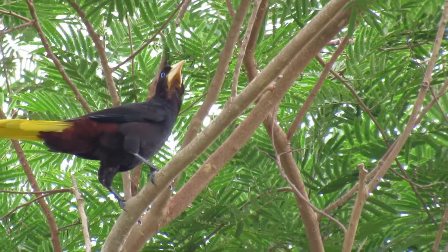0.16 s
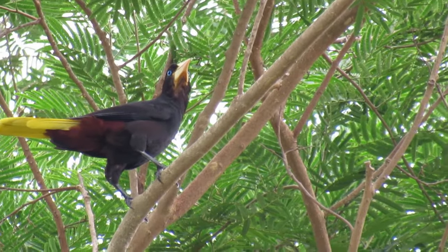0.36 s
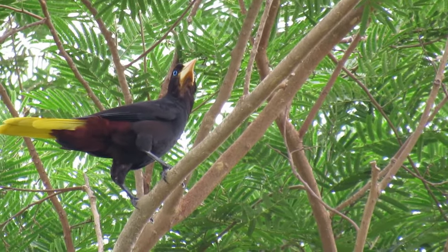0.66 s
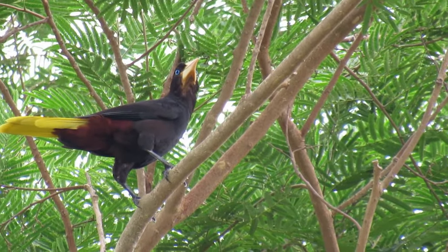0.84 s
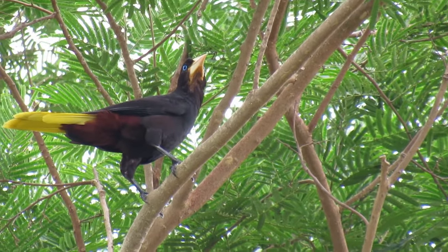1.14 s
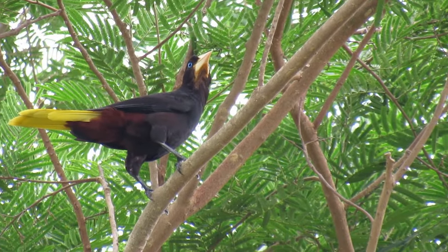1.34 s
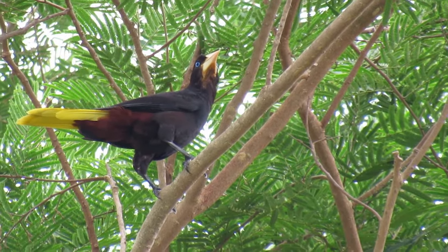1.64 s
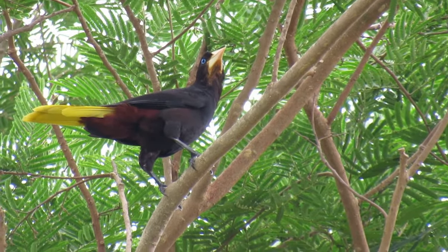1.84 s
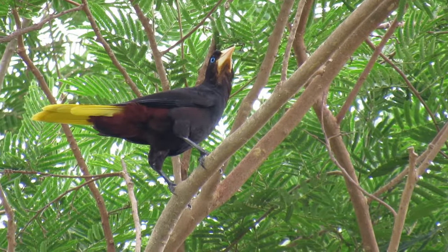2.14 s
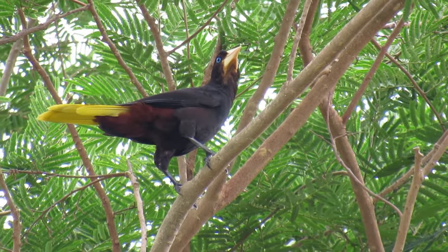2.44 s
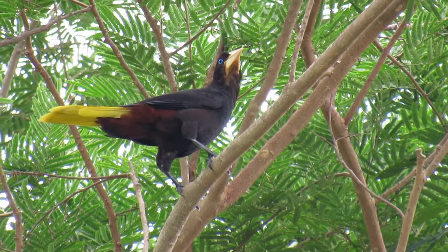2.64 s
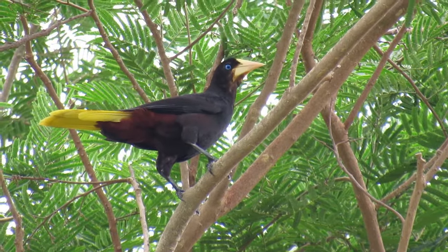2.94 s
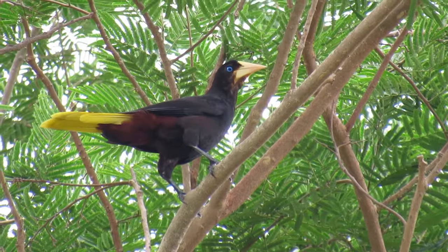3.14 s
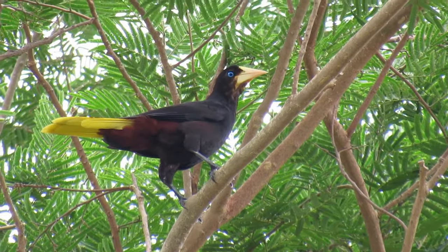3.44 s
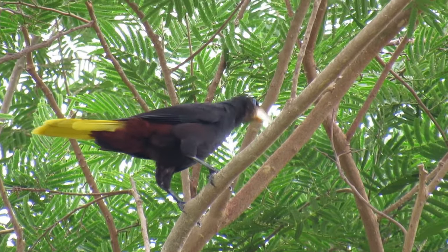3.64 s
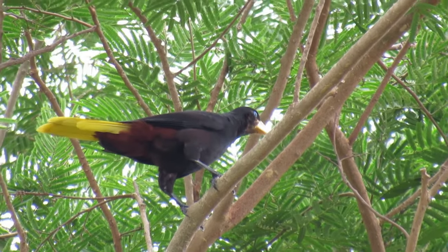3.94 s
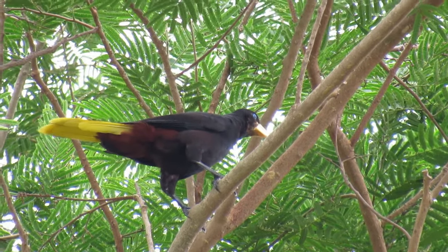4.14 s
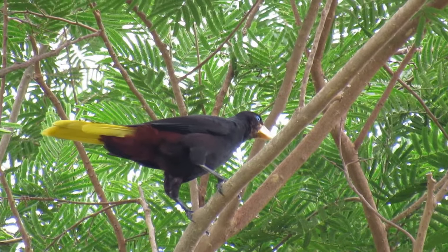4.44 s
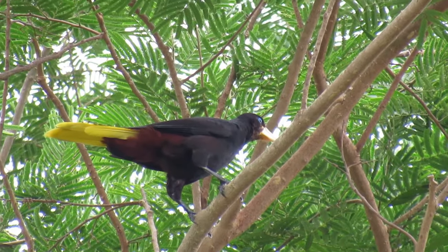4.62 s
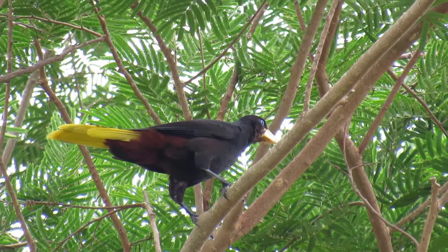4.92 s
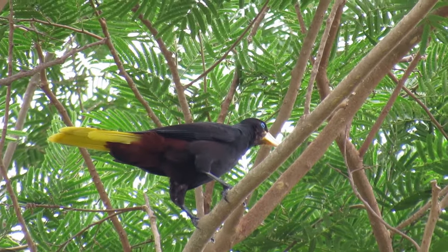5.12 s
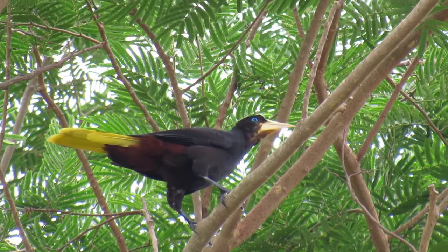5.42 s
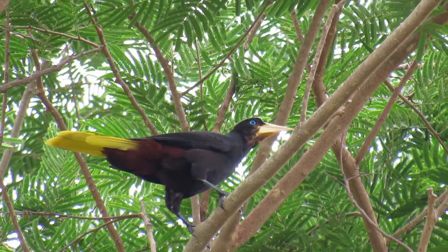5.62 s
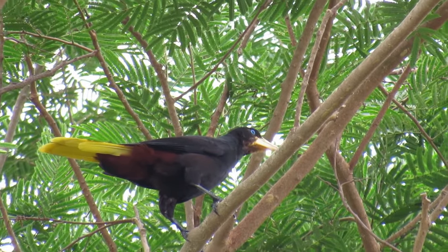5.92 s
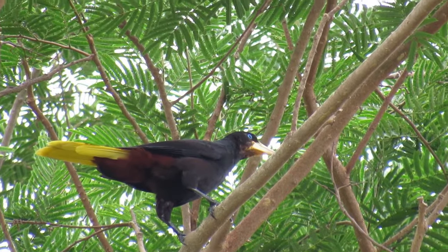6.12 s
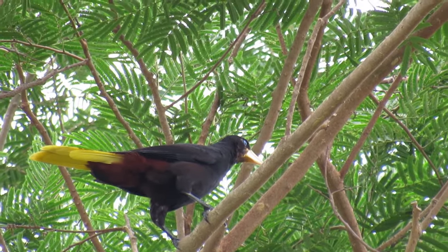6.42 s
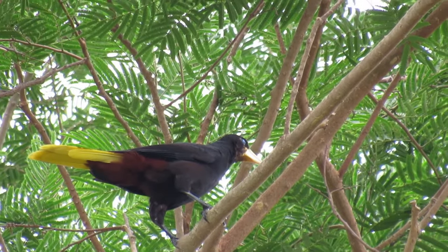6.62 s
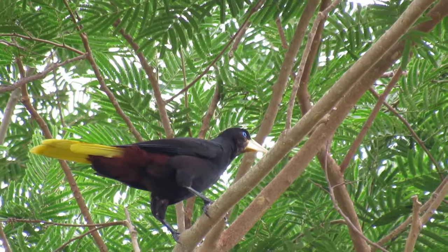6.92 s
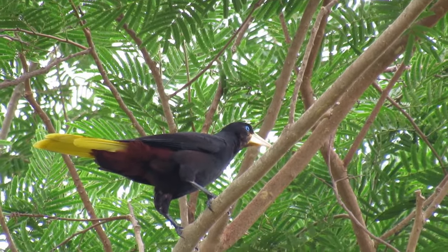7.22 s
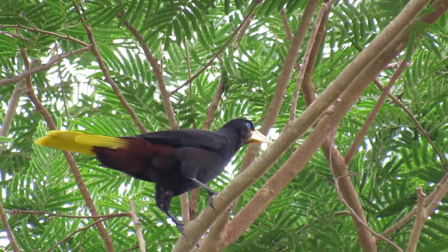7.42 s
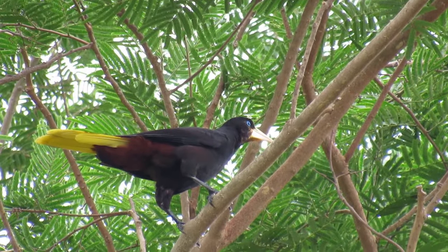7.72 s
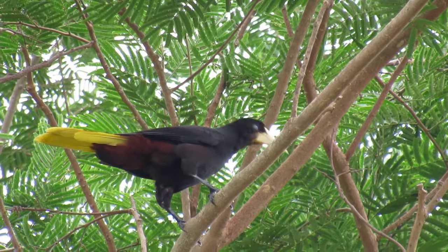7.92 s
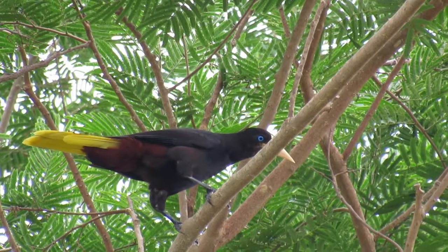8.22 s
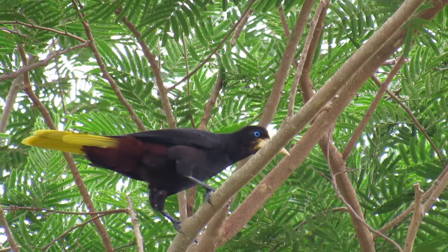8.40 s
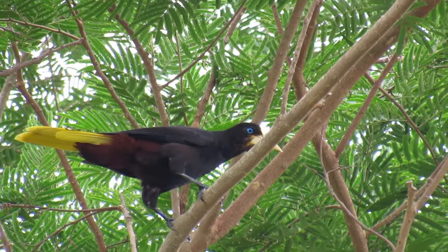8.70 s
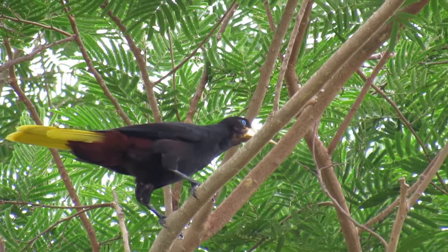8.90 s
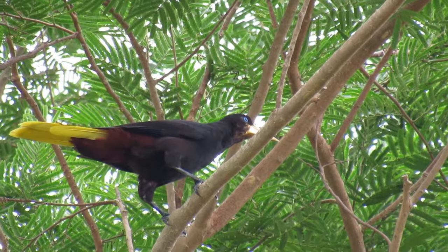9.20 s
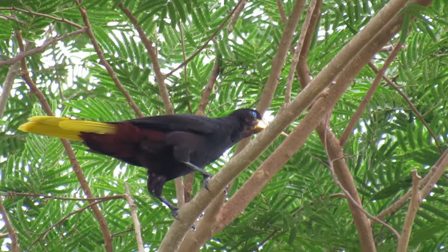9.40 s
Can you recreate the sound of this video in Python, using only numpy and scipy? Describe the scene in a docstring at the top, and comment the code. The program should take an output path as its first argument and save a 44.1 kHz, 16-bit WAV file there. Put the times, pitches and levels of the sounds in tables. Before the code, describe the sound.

Outdoors among trees, a bird's buzzy descending whistle tumbles into knocks, liquid gurgles and low coos, then repeats above distant engine rumble.

```python
"""Tropical trees: a large bird sings twice, as two voices in one windpipe. Harmonic stacks through resonances
make its falling buzzy whistle and cooed notes; short pitched bursts make hollow clucks and a gurgle.
An insect's throbbing tone sits near 7.5 kHz; gliding sines are far birds, the singer's own faint squeaks and
low hum, and a rising whine. Harmonics of a firing rate idle as a distant engine; crackle through a small body
rasps now and then. Leaves, traffic and microphone hiss are noise bands; two small ports hear it all."""
import sys
import numpy as np
from scipy import signal
from scipy.fft import rfft, irfft, next_fast_len
from scipy.io import wavfile
from scipy.ndimage import uniform_filter1d

SR = 44100
rng = np.random.default_rng(int(sys.argv[2]) if len(sys.argv) > 2 else 0)


def gain_from_db(level_db):
    """Convert decibel levels to linear amplitude factors (20 dB per decade)."""
    decades = np.asarray(level_db, float) / 20
    return 10 ** decades


def pcm_store(signal):
    """Save signal as 16-bit PCM."""
    levels = np.round(np.clip(np.atleast_2d(signal), -1, 1) * 32767)
    wavfile.write(sys.argv[1], SR, levels.astype(np.int16).T)


N = 421155
T = np.arange(N) / SR
SIZE = next_fast_len(N + SR)
HZ = np.maximum(np.arange(SIZE // 2 + 1) * SR / SIZE, 1)

# the two ports: f/Hz, left minus right/dB, left's lead less one full turn/rad, likeness of diffuse sound/0-1
PORTS = [(45, -10, -1.2, .97), (110, -13, -1.6, .65), (200, -11, -3.3, .3), (400, -5, -3.7, .5),
         (700, -3, -3.9, .45), (1300, -2, -5.2, .4), (2100, -2, -6.1, .7), (4300, -2.5, -6.3, .78),
         (7800, -3.3, -6.3, .87), (14400, 0, -6.3, .86)]
# leaves, traffic and microphone hiss: f/Hz, level/dB per Hz
BED = [(25, -73), (60, -69), (110, -66), (270, -71.5), (350, -77), (560, -82.5), (820, -86.5), (1300, -89),
       (2600, -95.5), (4000, -101), (8500, -102), (13000, -108), (14200, -111), (15000, -140)]
# idling engine: t/s, firing rate f/Hz, level/dB of the fundamental, level/dB of the second harmonic
ENGINE = [(0.0, 45.06, -33, -41), (0.16, 45.62, -36, -40.5), (0.5, 43.74, -39.5, -54),
          (0.66, 45.49, -40, -44), (1.57, 43.85, -50, -48.5), (1.89, 47.1, -44.5, -42.5),
          (2.308, 45.63, -46, -44.5), (4.92, 48.34, -40.5, -43.5), (6.199, 46.15, -49.5, -43.5),
          (6.46, 46.6, -41.5, -46), (9.34, 46.56, -48, -45.5), (9.55, 47.07, -53.5, -41)]
# its steady orders: multiple of the firing rate, level/dB
ENGINE_ORDERS = [(1.5, -57.5), (3, -48), (4, -54), (5, -57), (5.5, -55.5)]
# resonances of the far insect chorus: f/Hz, width/Hz of one pass, gain/dB
CHORUS = [(7310, 210, -6.5), (7148, 250, -6.5), (6700, 184, -12)]
# busy spells of faint chirps: start t/s, end t/s
CHATTER_SPELLS = [(0, 1.3), (5.9, 6.8), (8, 9)]
# thin faint whistles: far birds, the singer's own faint squeaks and low hum, a rising whine:
# t/s, length/s, start f/Hz, end f/Hz, level/dB
THIN_WHISTLES = [(.062, 0.052, 4500, 4420, -66), (0.475, 0.13, 5210, 5150, -69),
                 (.695, 0.0224, 3490, 3300, -60), (0.952, 0.032, 3450, 3310, -65),
                 (1.6, 0.022, 5600, 5760, -65), (1.62, 0.05, 5200, 5150, -68),
                 (1.68, 0.016, 5700, 5400, -61), (3.03, 0.5, 6850, 7010, -63),
                 (3.228, 0.027, 6500, 4994, -68), (3.42, .55, 7020, 7390, -58),
                 (6.32, .11, 9900, 9950, -73), (6.48, .025, 4100, 3700, -68), (6.57, 0.49, 1500, 1487, -66),
                 (6.625, 0.05, 2280, 2344, -68), (6.703, 0.29, 540, 619, -60),
                 (8.025, 0.053, 6400, 4154, -70), (8.251, 0.038, 6314, 4970, -66),
                 (8.582, 0.025, 3450, 2980, -64)]
# short rasps: t/s, nominal length/s, level/dB ahead of the body
RASPS = [(1.428, 0.0504, -51.5), (3.381, 0.045, -52), (4.63, 0.04, -52), (6.039, 0.044, -55),
         (7.69, 0.046, -54), (8.663, 0.041, -53)]
# the small body they ring: f/Hz, width/Hz of one pass, gain/dB
RASP_RING = [(1577, 340, 9.5), (2230, 1520, 10.5), (3420, 1300, 2.5), (5780, 1200, 1.5), (9050, 2200, -0.5)]
# round clucks of the low voice, throat tuned to the second harmonic, and a brief high overtone of a coo
# at 7.78 s: t/s, length/s, pitch f/Hz, level/dB
CLUCKS = [(1.288, 0.023, 479, -42), (1.336, 0.026, 438.8, -52), (1.52, 0.035, 616, -53.5),
          (1.647, 0.032, 570, -51.5), (2.146, 0.045, 471, -37), (6.257, 0.036, 469, -51.5),
          (6.402, .018, 413, -47), (6.537, 0.088, 466, -42.5), (6.714, 0.033, 559, -55),
          (6.831, 0.073, 567, -55), (6.897, 0.045, 748, -56), (6.931, 0.0245, 574, -44.5),
          (7.013, .025, 579, -37), (7.406, 0.034, 727, -32), (7.459, 0.04, 477, -37.5),
          (7.782, .05, 825, -50), (8.031, 0.022, 775, -48.5)]
# hard knocks, throat wide open: t/s, pitch f/Hz, level/dB, level/dB of the snap ahead of its ring, throat f/Hz
KNOCKS = [(1.703, 543, -53, -39, 1100), (1.761, 535, -43.5, -38, 1385), (1.829, 666, -37.5, -30.5, 1600),
          (1.9, 710, -36, -34.5, 1440), (1.958, 706, -34.5, -29, 1460), (2.028, 334.4, -37, -34.5, 1449),
          (2.093, 314, -38, -33.5, 1510), (7.081, 382, -45, -40.5, 1470), (7.142, 310, -44, -37, 1488),
          (7.214, 311.2, -47.5, -33.5, 1713), (7.279, 310, -43, -40, 1610),
          (7.342, 653, -40.5, -54.5, 1830), (8.178, 396, -49, -47, 1650)]
# resonances of the snap that opens a knock: f/Hz, width/Hz of one pass, gain/dB
SNAP_RING = [(4646, 450, -9), (6500, 370, 5.5), (8300, 300, -8), (3000, 2500, -9.5)]
# gurgles, five quick gulps a song: t/s, level/dB, throat f/Hz
GULPS = [(2.231, -38.5, 1210), (2.265, -34.5, 1340), (2.295, -38.5, 1110), (2.328, -36.5, 1300),
         (2.362, -37, 1035), (7.532, -39, 1250), (7.565, -42.5, 1327), (7.595, -37, 1190),
         (7.628, -40, 1323), (7.658, -38.5, 1120)]
# cooed notes of the low voice: t/s, pitch f/Hz, level/dB of the second harmonic, third harmonic/dB against it
COOS = [
    [(2.49, 450.4, -49.5, -15), (2.504, 454, -35, -30), (2.524, 446, -43, -24), (2.54, 416, -40, -18.5),
     (2.57, 445, -70, -8.5)],
    [(2.66, 473.1, -55, -11), (2.692, 482.7, -39.5, -27), (2.762, 501.3, -35.5, -38),
     (2.81, 475.3, -34.5, -9), (2.848, 488, -35, -14), (2.882, 476, -33, -8.5), (2.904, 457, -36, -20.5),
     (2.922, 442.4, -42, -3), (2.958, 451, -37.5, -25), (2.966, 447, -48, -8), (3.01, 375, -49, -4.5)],
    [(7.78, 421.6, -42.5, -16), (7.796, 422, -31.5, -41), (7.838, 427, -57, -23),
     (7.864, 415.5, -50, -21.5), (7.9, 417.5, -50, -15)],
    [(7.95, 463, -42, -13.5), (7.964, 478.5, -37.5, -22), (7.99, 460.5, -40.5, -25),
     (8.006, 442, -40, -24.5), (8.02, 422.2, -45, -22), (8.036, 430, -57, -6), (8.07, 435, -53, -13),
     (8.1, 429.8, -62, -8)],
]
# falling whistle of the high voice, once a song, ahead of the mix trim:
# t/s, pitch f/Hz, level/dB of the beak resonance, its centre f/Hz, throat resonance/dB against it
FALLS = [
    [(1.712, 3850, -38.5, 7600, -12), (1.735, 4050, -44, 8000, -6), (1.749, 3716, -30, 7320, -13),
     (1.807, 3735, -36, 7380, -0.5), (1.821, 3574, -27, 7180, -35.5), (1.843, 3584, -36.5, 6740, -17),
     (1.871, 3300, -26, 6500, -28), (1.953, 2950, -40, 7000, 2), (1.969, 2980, -41, 6800, -4),
     (1.989, 2894, -42.5, 7060, 0.5), (2.057, 2785, -33, 6300, -19), (2.097, 2713, -34, 7160, -8),
     (2.117, 2600, -35.5, 6800, -15), (2.155, 2594, -35, 5730, -15)],
    [(6.97, 3945, -44, 7810, -13.5), (7.022, 3855, -43.5, 7690, -9.5), (7.072, 3646, -42, 7270, -14),
     (7.112, 3464, -45.5, 7300, -11), (7.186, 3223, -34.5, 7330, -10), (7.246, 3265, -47.5, 6678, -5),
     (7.292, 2918, -37.5, 8700, -2.5), (7.322, 2990, -48.5, 8750, -3.5), (7.34, 2810, -43.5, 8300, -0.5),
     (7.38, 2753, -39, 7860, 0), (7.412, 2667, -37, 7920, -16), (7.424, 2745, -34, 7850, 1),
     (7.452, 2670, -34.5, 7780, -28), (7.465, 2620, -45.5, 7850, -12)],
]
# a held buzz and an arched note, a register lower, follow each fall:
# same columns, then level/dB of the fundamental
BUZZES = [
    [(2.152, 1825, -29, 6880, -12, -40), (2.17, 1877, -35, 6500, -8, -46), (2.184, 1913, -38, 5730, 5, -42),
     (2.2, 1830, -34, 5550, -4, -41), (2.218, 1828, -31, 5900, -6, -42),
     (2.244, 1786, -39, 6300, -13.5, -49), (2.266, 1884, -32.5, 7100, -6, -66),
     (2.294, 1867, -35, 6600, -8, -70), (2.38, 1814, -42, 6500, -17.5, -61.5)],
    [(2.388, 2200, -39, 6540, -4, -60), (2.401, 2180, -36, 6500, -9, -47),
     (2.433, 2246, -37.5, 6450, -2, -46), (2.455, 2250, -36, 6500, 4, -48.5),
     (2.466, 2246, -38, 6700, -14.5, -48), (2.476, 2036, -41, 7300, -10, -42),
     (2.495, 2070, -59, 6710, -6, -58)],
    [(7.462, 1928, -47.5, 7310, 2, -67), (7.486, 1880, -39, 6660, 1.5, -58),
     (7.506, 1778, -45, 5700, -2, -48), (7.54, 1790, -38.5, 5210, -5, -48),
     (7.58, 1770, -39.5, 5244, -2.5, -46), (7.594, 1722, -35.5, 5310, -15, -37),
     (7.622, 1684, -39.5, 5230, -11.5, -46), (7.668, 1617, -39.5, 7300, -9, -49)],
    [(7.67, 2083, -58, 8310, 17, -62), (7.684, 2160, -51.5, 8300, 18, -60),
     (7.694, 2150, -45, 7720, 2, -62.5), (7.704, 2207, -45, 8100, 1.5, -46),
     (7.736, 2260, -53, 8150, 7, -45), (7.746, 2265, -49, 8410, 3, -40.5), (7.77, 2256, -55, 8100, 15, -47),
     (7.782, 2207, -53, 8140, -3, -57)],
]


def along(table, column):
    """A column of an (f/Hz, ..) table, read at every frequency on a log scale."""
    table = np.array(table, float)
    return np.interp(np.log(HZ), np.log(table[:, 0]), table[:, column])


def ring(x, modes):
    """Parallel resonances (f/Hz, width/Hz, gain/dB), each applied twice for steep skirts."""
    gain = sum(gain_from_db(db) / (1 + 1j * (HZ - hz ** 2 / HZ) / width) ** 2 for hz, width, db in modes)
    return irfft(rfft(x, SIZE) * gain, SIZE)[:N]


def walk(rate):
    """Random levels held 1 / rate s and slewed twice; spread near 1."""
    hold = int(SR / rate)
    steps = np.repeat(rng.standard_normal(N // hold + 1), hold)
    return 1.2 * uniform_filter1d(uniform_filter1d(steps, hold), hold)[:N]


def swell(length, attack):
    """Envelope of one note: rises over the share attack, then dies away."""
    u = np.linspace(0, 1, max(int(length * SR), 8))
    attack = np.clip(attack, .02, .9)
    return np.sin(np.pi / 2 * np.minimum(u / attack, (1 - u) / (1 - attack))) ** 2


def tone(hz):
    """A sine that follows a moving frequency in Hz."""
    return np.sin(2 * np.pi * np.cumsum(hz) / SR)


def add(out, s, x):
    """Mix x in at s seconds."""
    i = int(s * SR)
    out[i:i + len(x)] += x[:N - i]


def ports(x, stray=None, aslant=1):
    """Left and right with their own level and lag; diffuse sound (stray given) is only partly alike.
    Sound from straight ahead (aslant near 0) reaches both almost in step."""
    like = 1 if stray is None else np.clip(along(PORTS, 3), 0, 1)
    right = gain_from_db(-along(PORTS, 1))
    turn = np.exp(-1j * aslant * (along(PORTS, 2) + 2 * np.pi))
    norm = 2 / np.sqrt(1 + right ** 2 + 2 * right * like * turn.real)  # holds the level of the two summed
    a = rfft(x, SIZE) * norm
    b = a * like * turn
    if stray is not None:
        b = b + rfft(stray, SIZE) * norm * np.sqrt(1 - like ** 2)
    return irfft(np.array([a, b * right]), SIZE)[:, :N]


def bed():
    """Leaves, traffic and hiss: octave bands of noise that swell together and flicker alone."""
    pair, gust = np.zeros((2, N)), walk(0.17)
    leaving_db = 5.4 * np.exp(-T / 1.32)  # a far vehicle's roar recedes from the middle bands
    for hz in 30 * 2. ** np.arange(10):
        share = np.cos(np.pi / 2 * np.clip(np.log2(HZ / hz), -1, 1))
        noise = rfft(rng.standard_normal((2, N)), SIZE)
        band = irfft(noise * share * gain_from_db(along(BED, 1)), SIZE)[:, :N]
        pair += band * gain_from_db(.2 * gust + 1.2 * walk(6) + (400 < hz < 4000) * leaving_db)
    return ports(*pair * np.sqrt(SR / 2))  # from level per Hz to full band


def engine():
    """Harmonics and half orders of the firing rate, each wavering on its own; two paths reach the ports."""
    s, hz, *levels = np.transpose(ENGINE)
    phase = 2 * np.pi * np.cumsum(np.interp(T, s, hz) * (1 + 0.01016 * walk(8))) / SR
    orders = [(k, np.interp(T, s, db)) for k, db in enumerate(levels, 1)] + ENGINE_ORDERS

    def path():
        return sum(gain_from_db(db + 0.6 * k * walk(10)) * np.sin(k * phase + 0.35 * k * walk(7)) for k, db in orders)

    return np.sqrt(2) * ports(path(), path())


def insect():
    """A wavering tone that throbs steadily; a duller chorus of noise further off fills the gaps."""
    throb_hz, buzz_hz, buzz_db, chorus_db = 71.7, 7510, -51, -33
    throb = .25 + np.sin(np.pi * (throb_hz * T + .05 * walk(3))) ** 4

    def buzz():
        return throb * gain_from_db(0.88 * walk(150)) * tone(buzz_hz * (1 + 0.013 * walk(400)))

    def chorus():
        return ring((1 + 0.25 * throb) * rng.standard_normal(N), CHORUS)

    near = gain_from_db(buzz_db + 0.3 * walk(1.9)) * ports(buzz(), buzz())
    far = gain_from_db(chorus_db + 0.65 * walk(2.91)) * ports(chorus(), chorus())
    return near + far


def chatter(count):
    """Faint scattered chirps from deep in the trees, rising sines roughened by noise, in a few busy spells."""
    out = np.zeros(N)
    length = .035  # s
    for spell, when, pitch, bend, size in rng.random((count, 5)):
        start, end = CHATTER_SPELLS[int(spell * len(CHATTER_SPELLS))]
        rough = 1 + 4 * uniform_filter1d(rng.standard_normal(int(length * SR)), 40)
        env = swell(length, .4) * rough
        hz = (2400 + 1000 * pitch) * np.linspace(1, 1 + 0.178 * bend, len(env))
        add(out, start + when * (end - start), gain_from_db(-69 + 4.6 * size) * env * tone(hz))
    return out


def thin_whistles():
    """Far birds, the singer's own faint squeaks and low hum, a rising whine: gliding sines of unsteady level."""
    out = np.zeros(N)
    for s, length, start_hz, end_hz, db in THIN_WHISTLES:
        env = swell(length, 0.45) ** 0.1  # nearly flat, soft at the very ends
        add(out, s, gain_from_db(db) * 2 * env * tone(np.linspace(start_hz, end_hz, len(env))))
    return out * gain_from_db(2.2 * walk(60))


def rasps():
    """A scratchy burst of dense crackle that rings a small body, swelling and holding before it stops."""
    out = np.zeros(N)
    for s, length, db in RASPS:
        whole = 1.4 * length  # with its soft ends
        env = swell(whole, .55) ** .4 * gain_from_db(2 * walk(300)[:int(whole * SR)])
        crackle = rng.standard_normal(len(env)) * (rng.random(len(env)) < .15)
        add(out, s, 5 * gain_from_db(db) * env * crackle)
    return ring(out, RASP_RING)


def trees(x, t60, thin_hz):
    """Scattered echoes off trunks and leaves, two unrelated tails; leaves return mostly treble."""
    t = T[:SR // 2]
    tail = rng.standard_normal((2, len(t))) * 1000 ** (-t / t60) * (t > .006)
    tail /= np.linalg.norm(tail[0])
    return irfft(rfft(x, SIZE) * rfft(tail, SIZE) / (1 - 1j * thin_hz / HZ), SIZE)[:, :N]


def bursts(rows, sag, bubble, attack):
    """Short harmonic bursts (t/s, length/s, pitch f/Hz, level/dB, throat f/Hz, width/Hz) that sag in pitch;
    the throat picks the harmonics and the air comes in puffs."""
    out = np.zeros(N)
    k = np.arange(1, 13)[:, None]
    turns = rng.uniform(0, 2 * np.pi, (len(rows), 12, 1))
    for (s, length, hz, db, throat_hz, width), turn in zip(rows, turns):
        env = swell(length, attack)
        env = env * (1 + bubble * np.sin(2 * np.pi * 115 * T[:len(env)]))
        phase = 2 * np.pi * np.cumsum(hz * np.linspace(1 + sag, 1 - sag, len(env))) / SR
        gain = 1 / (1 + ((k * hz - throat_hz) / (width / 2)) ** 2) ** 1.404
        harmonics = (gain * np.sin(k * phase + turn)).sum(axis=0) / np.linalg.norm(gain)
        add(out, s, gain_from_db(db) * 2 * env * harmonics)
    return out


def clucks():
    """Clucks with one brief coo overtone, knocks and gulps; a knock chirps down,
    a gulp is low, starts hard and bubbles most."""
    knock_s, gulp_s, gulp_hz = 0.025, 0.027, 238.5
    cluck_width, knock_width, gulp_width = 400, 900, 640  # throat, Hz
    plain = [(s, length, hz, db, 2 * hz, cluck_width) for s, length, hz, db in CLUCKS]
    knocks = [(s, knock_s, hz, db, throat_hz, knock_width) for s, hz, db, _, throat_hz in KNOCKS]
    gulps = [(s, gulp_s, gulp_hz, db, throat_hz, gulp_width) for s, db, throat_hz in GULPS]
    low = bursts(plain, sag=0.04, bubble=0.077, attack=0.31)
    low += bursts(knocks, sag=0.061, bubble=0.27, attack=.12)
    low += bursts(gulps, sag=0.096, bubble=0.38, attack=.22)
    return low * gain_from_db(2.68 * walk(200))


def snaps():
    """A dry burst of air, noise through resonances, opens each knock."""
    out = np.zeros(N)
    for s, _, _, db, _ in KNOCKS:
        env = swell(0.018, 0.028)
        add(out, s + .002, 3 * gain_from_db(db) * env * rng.standard_normal(len(env)))
    return ring(out, SNAP_RING)


def stacks(tables, gains, shake, drift, flutter_db, breath, pull=0):
    """One voice as a harmonic stack: pitch shakes, each harmonic flickers;
    turbulent air spreads noise around the lines."""
    s, *controls = np.concatenate(tables).T
    hz, *controls = (np.interp(T, s, c) for c in controls)
    sounding = sum((T >= rows[0][0]) & (T < rows[-1][0]) for rows in tables)
    gate = uniform_filter1d(np.minimum(sounding, 1.), 200)
    phase = 2 * np.pi * np.cumsum(hz * (1 + shake * walk(260) + drift * walk(45) - pull)) / SR
    stack = sum(g * gain_from_db(0.53 * flutter_db * walk(35)) * np.sin(k * phase)
                for k, g in enumerate(gains(hz, *controls), 1))
    unsteady = gain_from_db(flutter_db * walk(110)) * (1 + breath * walk(2200))
    return np.sqrt(2) * gate * stack * unsteady


def coo_gains(hz, db, third_db):
    """The closed throat favours the second harmonic; the third comes and goes."""
    return [gain_from_db(db - 19.5), gain_from_db(db), gain_from_db(db + third_db), gain_from_db(db - 49)]


def whistle_gains(hz, db, beak_hz, throat_db):
    """Harmonics 1 to 5 share the strength of a moving beak resonance and a fixed throat resonance."""
    beak_width, beak_from, top_hz = 2640, 4800, 9330  # Hz
    throat_hz, throat_width = 3520, 1300
    partial = np.arange(1, 6)[:, None] * hz
    beak = 1 / (1 + (2 * (partial - beak_hz) / beak_width) ** 2) / (1 + (partial / top_hz) ** 16)
    beak = beak * (partial > beak_from)
    throat = 1 / (1 + (2 * (partial - throat_hz) / throat_width) ** 2)

    def unit(g):
        return g / np.linalg.norm(g, axis=0)

    return gain_from_db(db) * (unit(beak) + gain_from_db(throat_db) * unit(throat))


def buzz_gains(hz, db, beak_hz, throat_db, first_db):
    """As the whistle, but the fundamental has a level of its own."""
    return [gain_from_db(first_db), *whistle_gains(hz, db, beak_hz, throat_db)[1:]]


def song():
    """Two voices share one windpipe: each cluck robs the whistle of air, pulls its pitch down
    and shakes it, which makes sum and difference tones."""
    low = clucks()
    strain = uniform_filter1d(np.abs(low), 220)
    pull = .045 * np.tanh(150 * uniform_filter1d(strain, 440))
    ripple = tone(78 * (1 + 0.15 * walk(20)))  # the membrane flutters
    high = np.zeros(N)
    for part, gains in ((FALLS, whistle_gains), (BUZZES, buzz_gains)):
        high += stacks(part, gains, shake=.003, drift=.004, flutter_db=3, breath=.3, pull=pull + .007 * ripple)
    high = high * (1 + 0.6 * ripple)
    coupled = high * (1 + 45 * low) / (1 + 260 * strain)
    coos = stacks(COOS, coo_gains, shake=.008, drift=.006, flutter_db=1.4, breath=.1)
    return gain_from_db(-4.5) * coupled + coos + low + snaps()


def scene():
    """Song, thin whistles and chatter with their echoes and the dry rasps, over engine, insect and bed."""
    calls = song() + thin_whistles() + chatter(count=36)
    echoes = gain_from_db(-3.5) * ports(*trees(calls, t60=0.36, thin_hz=1900))
    direct = ports(calls + rasps(), aslant=0.493)
    return direct + echoes + engine() + insect() + bed()


def band_limit(x):
    """A steep low-pass at the top of the band."""
    return signal.sosfilt(signal.butter(12, 15010, fs=SR, output="sos"), x)


def record(dry):
    """The microphone housing cancels a narrow band near 700 Hz."""
    notch_hz, width, depth = 690, 260, .85  # Hz, Hz, share cancelled
    notch = 1 - depth / (1 + 1j * (HZ - notch_hz ** 2 / HZ) / width)
    mix = irfft(rfft(dry, SIZE) * notch, SIZE)[:, :N]
    return band_limit(mix)


dry = scene()
out = record(dry)
pcm_store(out)
```